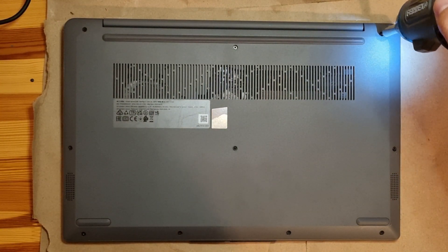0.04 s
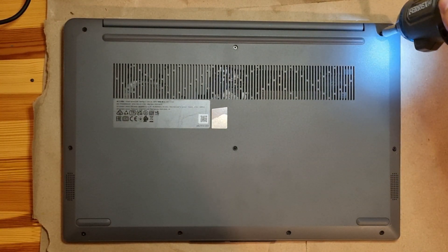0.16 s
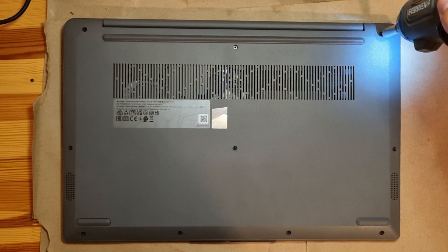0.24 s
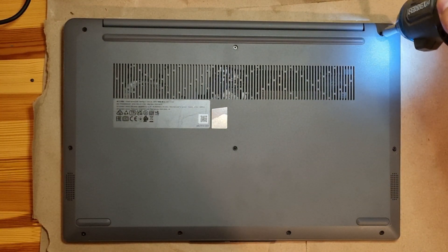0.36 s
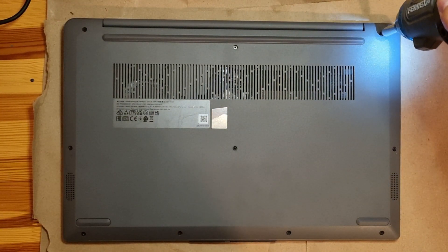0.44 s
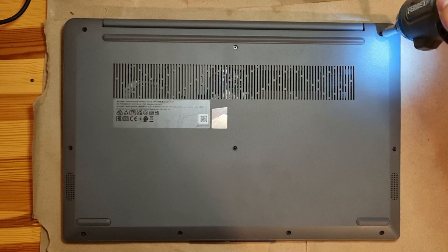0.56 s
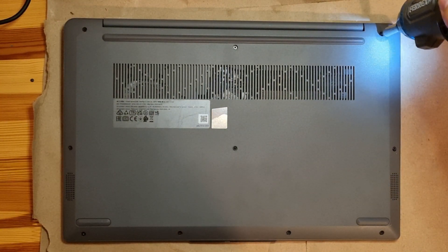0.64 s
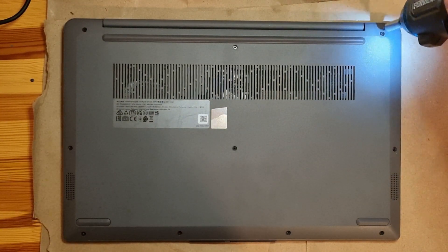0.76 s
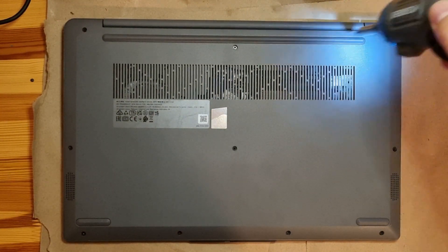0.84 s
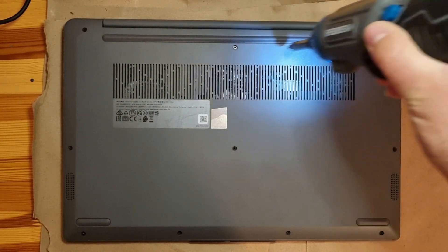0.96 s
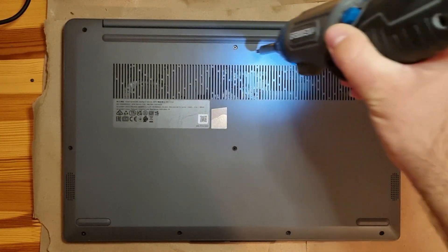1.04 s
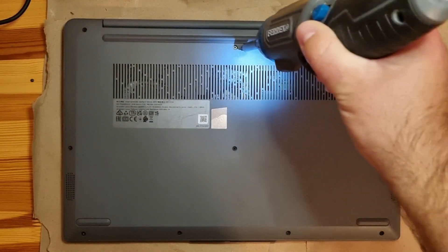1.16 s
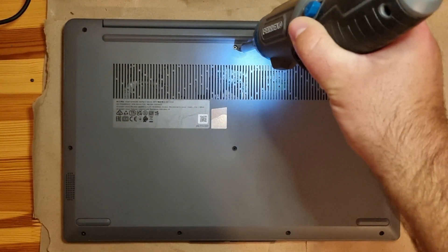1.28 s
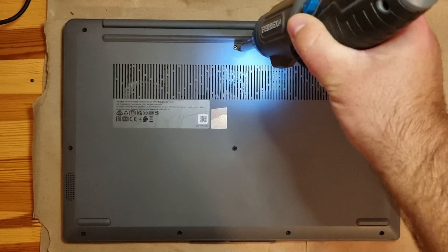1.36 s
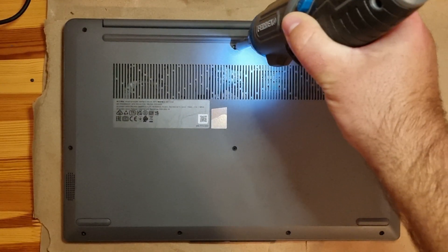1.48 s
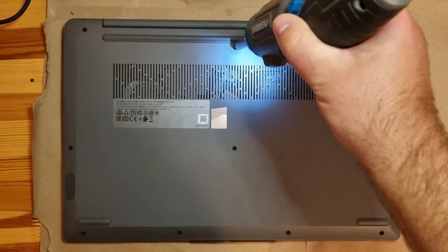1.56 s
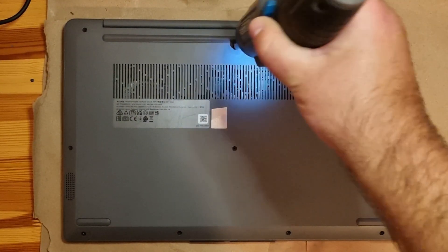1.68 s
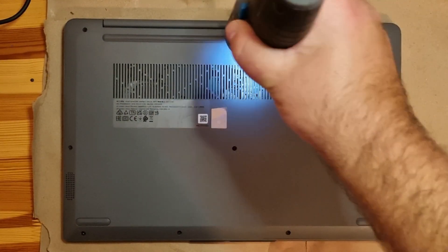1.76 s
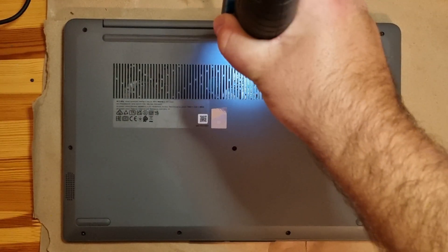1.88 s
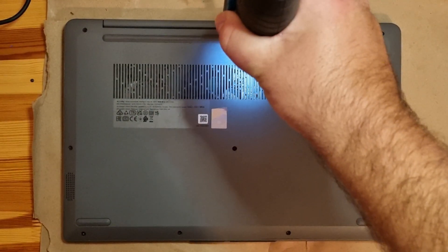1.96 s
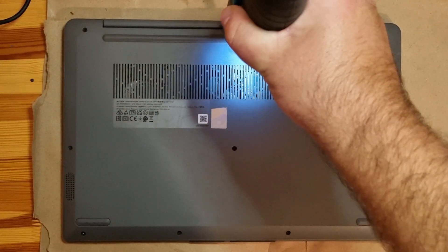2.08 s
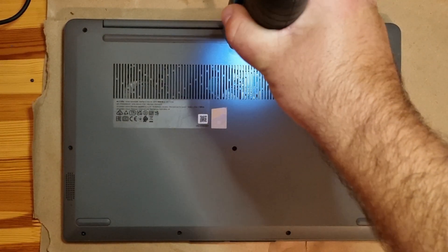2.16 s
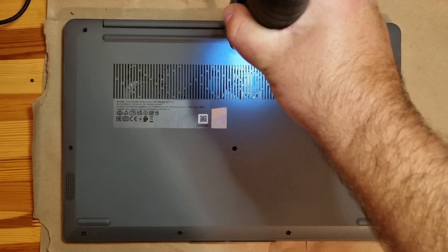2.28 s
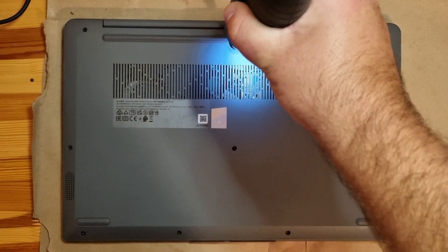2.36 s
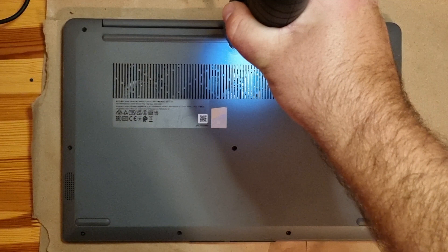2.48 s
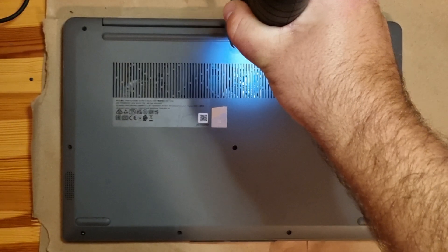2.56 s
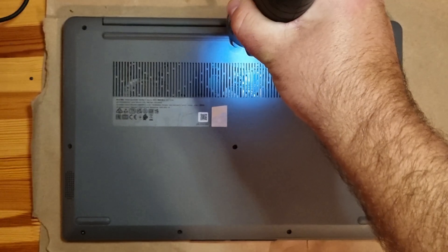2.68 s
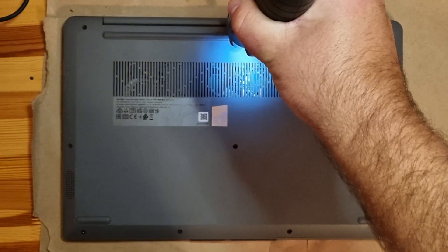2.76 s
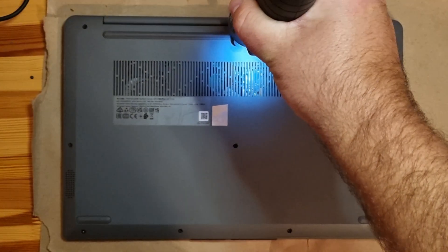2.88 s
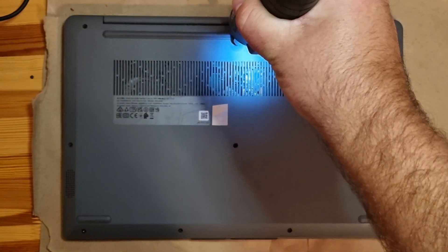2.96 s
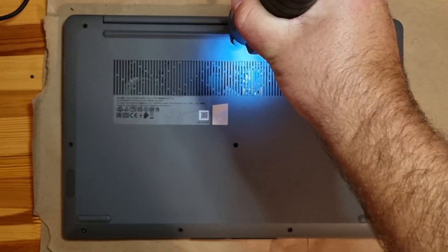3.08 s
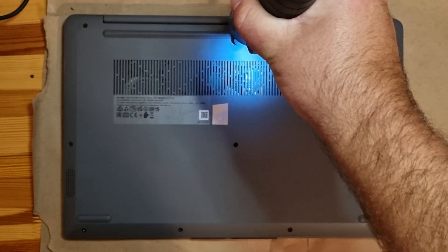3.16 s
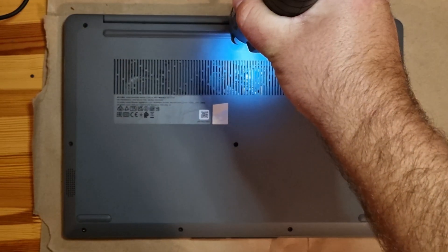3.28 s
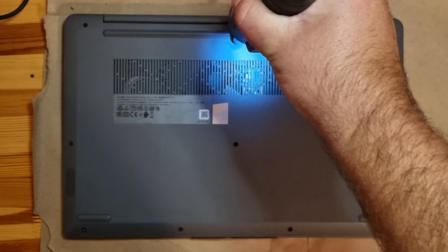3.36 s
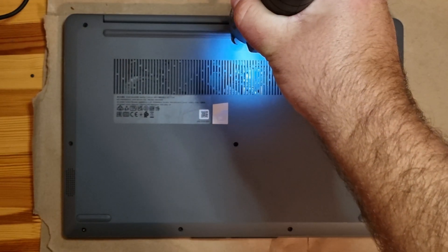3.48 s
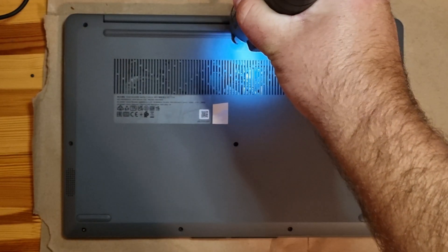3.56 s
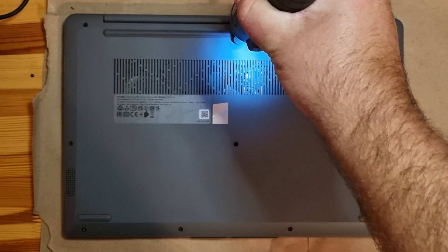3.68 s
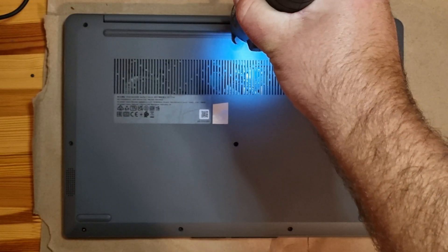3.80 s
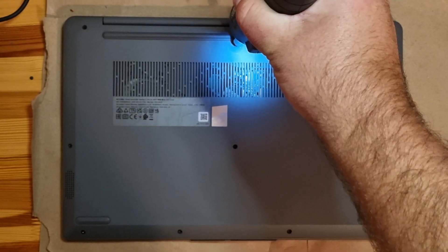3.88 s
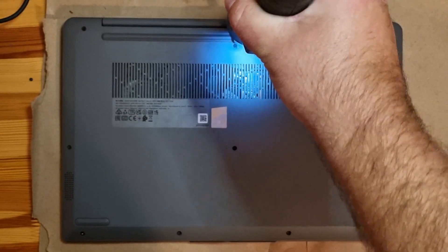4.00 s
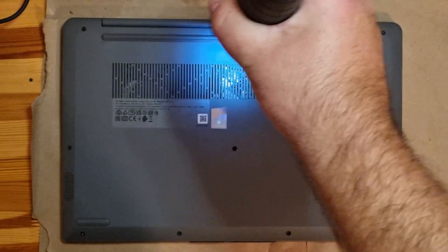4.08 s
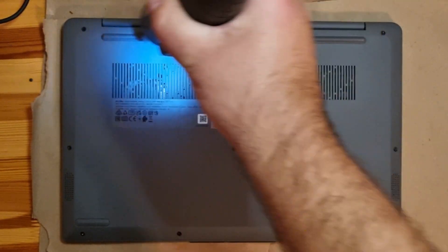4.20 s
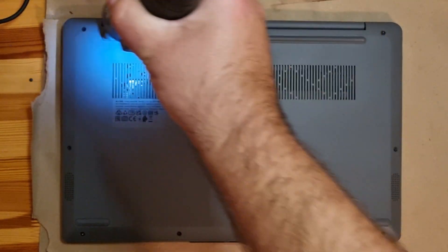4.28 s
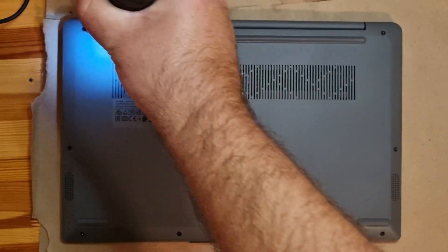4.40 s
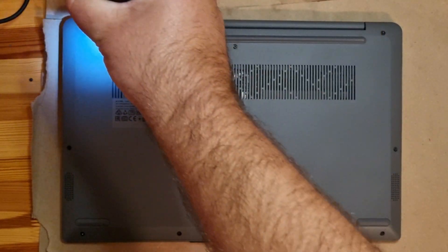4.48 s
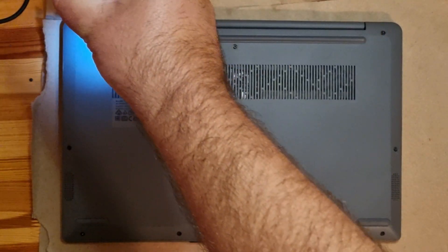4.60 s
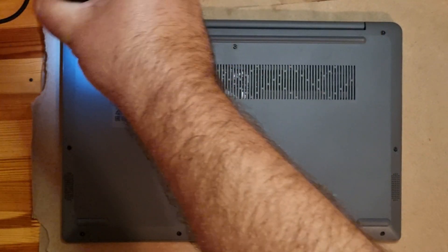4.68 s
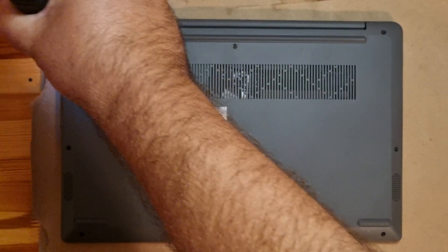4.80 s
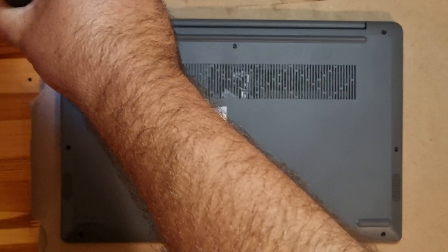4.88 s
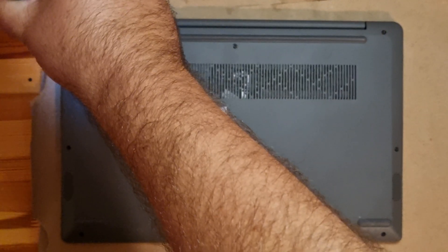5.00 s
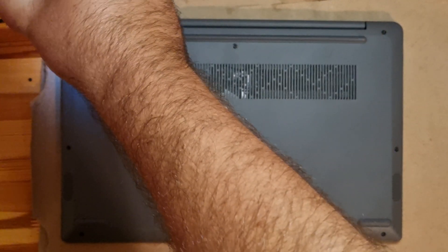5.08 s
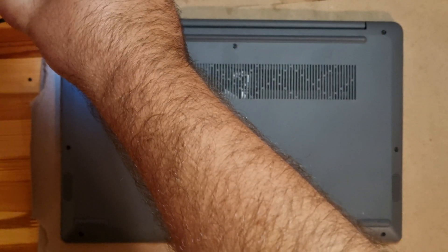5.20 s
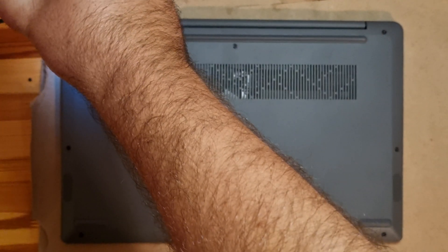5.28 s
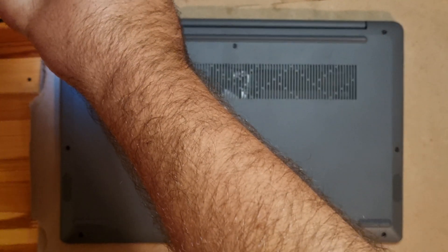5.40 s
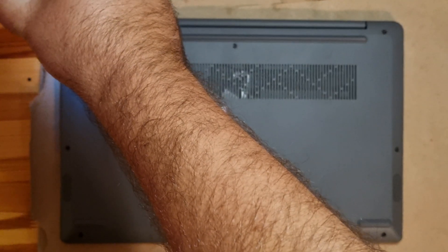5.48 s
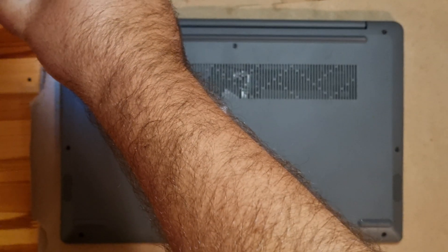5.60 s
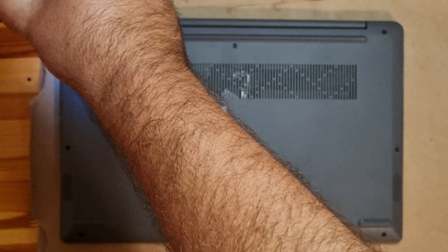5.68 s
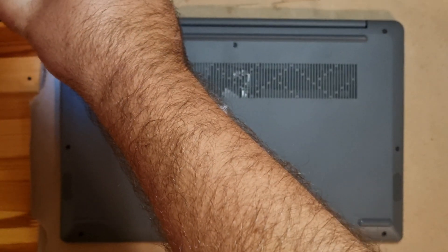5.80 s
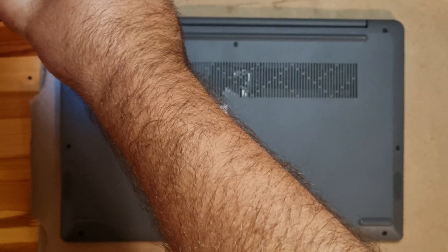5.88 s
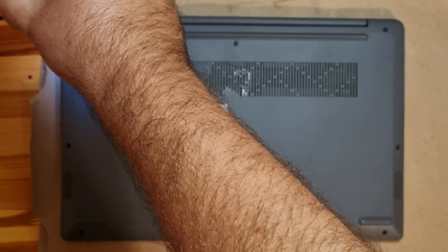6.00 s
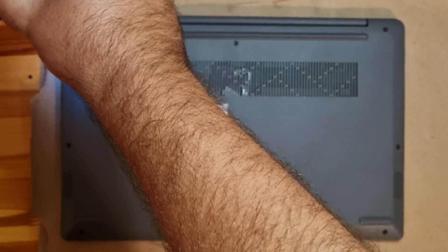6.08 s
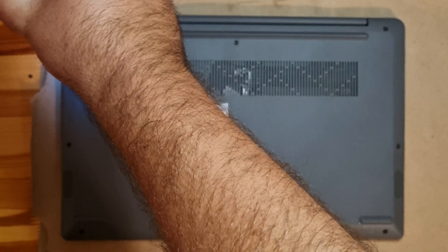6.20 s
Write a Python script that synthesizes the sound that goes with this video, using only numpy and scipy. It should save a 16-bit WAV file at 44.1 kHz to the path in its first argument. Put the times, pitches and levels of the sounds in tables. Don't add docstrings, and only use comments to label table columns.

```python
import sys
import numpy as np
from scipy import signal
from scipy.fft import rfft, irfft
from scipy.io import wavfile
from scipy.ndimage import uniform_filter1d, map_coordinates

SR = 44100
rng = np.random.default_rng(int(sys.argv[2]) if len(sys.argv) > 2 else 0)


def gain_from_db(level_db):
    decades = np.asarray(level_db, float) / 20
    return 10 ** decades


def master(y):
    cut = np.clip(np.atleast_2d(y).T, -1, 1)
    pcm = np.round(cut * 32767)
    wavfile.write(sys.argv[1], SR, pcm.astype(np.int16))


N = 275625
T = np.arange(N) / SR

# f/Hz, level/dB per Hz
AIR = [(15, -27), (25, -12), (108, -1), (317, -7), (463, 3.5), (1560, -10.5), (1890, -29), (2050, -7),
       (5730, -19.5), (14000, -50), (16000, -38)]
# f/Hz, side minus mid level/dB
SIDE_MINUS_MID = [(60, 4.5), (110, -15.5), (200, -3), (380, -9), (700, -2.5), (1290, 0), (2380, -4),
                  (4400, 1), (8120, -0.5), (15000, 0)]
# f/Hz, left minus right level/dB
LEFT_MINUS_RIGHT = [(60, -10), (110, 4.5), (200, 3), (380, 1.5), (700, 0.5), (1290, 0), (2380, 1.5),
                    (4400, -1), (8120, 2), (15000, -3.5)]

# t/s, then level/dB of each of the three desk modes
THUDS = [
    (0.449, -38, -44, -46.5),
    (3.668, -37.5, -57, -54),
    (3.84, -62, -70, -76),
    (4.768, -38.5, -67, -63),
    (4.818, -46, -78, -69),
    (4.94, -59, -86, -72),
]
# f/Hz, ring t/s
DESK_MODES = [(65, 0.25), (122, 1.18), (190, 0.61)]

# t/s, peak level/dB, centre f/Hz, length t/s
TICKS = [(0.446, -22, 2800, .002), (1.175, -36, 1700, 0.0051), (1.177, -46, 11500, 0.011),
         (1.197, -47.5, 11000, 0.015), (1.416, -50, 11000, 0.0087), (1.427, -52, 8000, 0.0045),
         (1.445, -43, 3300, 0.0049), (1.442, -40, 1500, 0.0044), (1.534, -69, 3800, .004),
         (1.54, -66, 3000, .004), (1.631, -53, 3500, 0.0065), (3.664, -27, 3300, .004),
         (4.432, -27.5, 2380, 0.003), (4.437, -37, 1500, 0.0048), (4.428, -39, 9000, 0.018),
         (4.548, -46, 1500, 0.005), (4.7078, -30, 3490, 0.0023)]
# t/s, peak level/dB, centre f/Hz, ring t/s, edge level/dB
TAPS = [(1.172, -30, 626, 0.054, -19), (1.194, -41, 632, 0.11, -12), (1.346, -48, 464, 0.07, -23),
        (1.3635, -42, 590, 0.076, -49), (1.389, -45, 579, 0.077, -38), (1.413, -36.5, 617, 0.13, -17),
        (1.429, -45, 640, 0.097, -24), (1.444, -38.5, 584, 0.047, -9), (1.469, -52, 650, 0.076, -23),
        (1.512, -49, 580, 0.056, -25), (4.345, -27.5, 920, 0.041, 3), (4.369, -30, 790, 0.052, -7),
        (4.376, -34.5, 766, 0.07, -13), (4.431, -30.5, 900, 0.03, -1), (4.547, -48, 756, 0.056, -9)]
# t/s, peak level/dB, centre f/Hz, ring t/s, edge level/dB
POPS = [
    (.4479, -10, 1440, 0.023, 8),
    (.449, -32, 490, 0.054, -16),
    (3.6628, -12, 756, 0.034, 0.5),
    (3.6643, -14.5, 1930, 0.019, -6),
    (3.6655, -31, 1090, 0.046, -6),
    (3.666, -39, 586, 0.09, 1),
    (4.347, -44, 366, 0.19, -30),
    (4.433, -45, 395, 0.19, -30),
]
COVER_HZ = np.geomspace(280, 4500, 30)

# start t/s, end t/s
RUNS = [
    (0, 1.63),
    (1.635, 4.7),
    (4.709, 6.25),
]
# release t/s, full shaft f/Hz, creep t/s, then middle, treble and cover buzz level/dB
TRIGGER = [
    (.635, 267.3, 0.23, -35, -36, -53),
    (3.915, 264.9, .12, -37, -36, -54),
    (6.5, 266.8, .4, -40, -37, -56.5),
]
FREED_S = [.448, 3.663, 7]
FULL_HZ = 266

ORDERS = [1, 2, 3, 4, 5, 6, 7.71, 9, 9.49, 10.09, 11.29, 12, 14, 15, 18, 21, 22, 23, 24, 27, 30, 33, 36, 48,
          58]
# level/dB in run 1, run 2 and run 3
WHINE = [(-56.5, -54.5, -54.5), (-95, -62.5, -66.5), (-56, -62, -67.5), (-54, -94, -84), (-79, -59.5, -67),
         (-59.5, -62.5, -63.5), (-71, -53, -60), (-54, -60, -54.5), (-72, -53.5, -71), (-74, -59, -63),
         (-72, -54, -57), (-60, -48.5, -51.5), (-70, -55.5, -60), (-62, -55, -58), (-67, -52, -56),
         (-68, -47.5, -56), (-71, -56, -56), (-55, -50.5, -53), (-58, -46.5, -57), (-53, -58, -50.5),
         (-68, -49, -54), (-56, -69, -66), (-69, -53, -57), (-60, -45, -63), (-63.5, -51, -59)]

# f/Hz, level/dB per Hz
FACING = [
    [(1000, -58), (1700, -11), (2340, -3), (2870, -5), (3130, -2.5), (4340, -6.5), (4510, -3.5), (6880, -3),
     (7770, -1), (8450, -4), (11000, -6), (12400, -2.5), (16000, -4)],
    [(1000, -38), (1700, -6.5), (1990, -5), (2590, -1), (3500, -2.5), (3810, -2), (4180, -4.5), (6150, -4),
     (7840, -9), (10200, -15), (12500, -12), (15100, -11), (16000, -11.5)],
    [(1000, -43), (1700, -10), (2010, -12), (2230, -10), (2450, -6), (2960, -7), (3500, -4.5), (4340, -7),
     (4910, -4.5), (7840, -8), (8860, -14.5), (15000, -10.5), (16000, -10.5)],
]
# f/Hz, width f/Hz, level/dB
HOUSING = [(420, 350, 7), (2100, 250, 7), (3600, 280, 6), (6210, 170, 9), (7750, 300, 3), (12500, 700, 0)]
# f/Hz, level/dB per Hz
BUZZ = [(100, -36), (200, -13.5), (330, -5.5), (420, -13.5), (560, -4.5), (800, -4), (1100, -2), (1400, 2),
        (1900, -7.5)]

# level/dB, rise t/s
START_DB = [-8, -16, -1]
RISE_S = [0.022, 0.023, .02]
SURGE_DB = [2.5, -1.5, 4.5]
FREED_DB = [0.6, 1, 4]
BRAKE_DB = [-2, 1, -2]
COAST_DB_PER_S = [-20.5, -37.5, -20.5]
STALL_DB_PER_S = [-63, -92, -12]
BRAKE_S = 0.04
TOP_HZ = 15750


def shape(x, points):
    hz, db = np.transpose(points)
    f = np.fft.rfftfreq(x.shape[-1], 1 / SR) + 1
    gain = gain_from_db(np.interp(np.log(f), np.log(hz), db))
    return irfft(rfft(x) * gain, x.shape[-1])


def unit(x):
    return x / np.sqrt(np.mean(x ** 2))


def walk(rate_hz):
    k = int(SR / rate_hz)
    held = np.repeat(rng.standard_normal(N // k + 1), k)
    return 1.22 * uniform_filter1d(uniform_filter1d(held, k), k)[:N]


def band(x, lo_hz, hi_hz):
    sos = signal.butter(3, [lo_hz, hi_hz], "bandpass", fs=SR, output="sos")
    return signal.sosfilt(sos, x, axis=-1)


def add(out, s, sound):
    i = int(s * SR)
    out[..., i:i + sound.shape[-1]] += sound[..., :N - i]


def microphones(mid, side, lead=0.38):
    quarter_turn = np.imag(signal.hilbert(mid))
    side = shape(np.sqrt(1 - lead ** 2) * side - lead * quarter_turn, SIDE_MINUS_MID)
    left_tilt = [(hz, db / 2) for hz, db in LEFT_MINUS_RIGHT]
    right_tilt = [(hz, -db) for hz, db in left_tilt]
    return np.array([shape(mid + side, left_tilt), shape(mid - side, right_tilt)])


def still_air():
    return gain_from_db(-63.5) * unit(microphones(*shape(rng.standard_normal((2, N)), AIR)))


def room(x, t60_s=0.5, level_db=-4):
    t = T[:SR // 2]
    colour = [(150, 16), (600, 1.5), (3000, 3), (12000, -10.0)]
    tail = shape(rng.standard_normal((2, len(t))), colour)
    tail = microphones(*(tail * 1000 ** (-t / t60_s) * np.clip(t / 0.0031, 0, 1)))
    tail /= np.sqrt(np.sum(tail ** 2) / 2)
    return gain_from_db(level_db) * signal.fftconvolve(x[None], tail, axes=1)[:, :N]


def desk_shake(shaft_hz):
    rumble = unit(band(rng.standard_normal((2, N)), 22, 120))
    return gain_from_db(-84.5 + 5.5 * walk(4.3)) * (shaft_hz / FULL_HZ) ** 2 * rumble


def desk_thuds():
    out, t = np.zeros(N), T[:SR]
    onset = 1 - np.exp(-t / 0.0015)
    for s, *levels_db in THUDS:
        for (hz, ring_s), db in zip(DESK_MODES, levels_db):
            tone = np.sin(2 * np.pi * hz * t) - 0.18 * np.sin(2.08 * np.pi * hz * t)
            add(out, s, gain_from_db(db) * tone * 1000 ** (-t / ring_s) * onset)
    return out


def bit_ticks(width=1.73):
    out, t = np.zeros((2, N)), T[:SR // 8]
    for s, peak_db, hz, length_s in TICKS:
        burst = band(rng.standard_normal((2, len(t))), hz / width, min(hz * width, TOP_HZ))
        envelope = np.exp(-t / length_s) * (1 - np.exp(-t / 0.00015))
        add(out, s, gain_from_db(peak_db) * unit(burst) / 2 * envelope)
    return microphones(*out)


def cover_blows(rows, focus, edge_hz, edge_focus, rise_s, scatter):
    out, t = np.zeros(N), T[:SR // 4]
    draws = rng.random((len(rows), 3, len(COVER_HZ), 1))
    for (s, peak_db, centre_hz, ring_s, edge_db), (size, detune, start) in zip(rows, draws):
        hz = COVER_HZ[:, None] * (1 + 0.082 * detune)
        near = np.exp(-(np.log(hz / centre_hz) / focus) ** 2)
        near += gain_from_db(edge_db) * np.exp(-(np.log(hz / edge_hz) / edge_focus) ** 2)
        fade = 1000 ** (-t / (ring_s * (700 / hz) ** 0.54))
        modes = (0.17 + size) * near * np.sin(2 * np.pi * (hz * t + scatter * start)) * fade
        ring = modes.sum(axis=0) * (1 - np.exp(-t / rise_s)) ** 2
        add(out, s, gain_from_db(peak_db) * ring / np.abs(ring).max())
    return band(out, 183, 9000)


def since(k):
    start_s = RUNS[k][0] or -3
    return np.maximum(T - np.array([[start_s], [FREED_S[k]], [TRIGGER[k][0]]]), 0)


def motor_speed():
    spin_up_s, creep_hz, freed_hz = 0.036, 7, 2
    brake_hz, coast_hz_per_s, crawl_hz = 20, 230, 59.88
    shaft_hz = np.zeros(N)
    for k, (_, full_hz, creep_s, *_) in enumerate(TRIGGER):
        on, free, off = since(k)
        speed = full_hz * (1 - 0.6 * np.exp(-on / spin_up_s))
        speed -= creep_hz * np.exp(-on / creep_s)
        speed += freed_hz * (free > 0)
        speed -= brake_hz * (1 - np.exp(-off / BRAKE_S)) + coast_hz_per_s * off
        shaft_hz = np.where(T >= RUNS[k][0], np.maximum(speed, crawl_hz), shaft_hz)
    return shaft_hz


def whine(shaft_hz, drive_db=3.5, waver=0.001225):
    turn = 2 * np.pi * np.cumsum(shaft_hz * (1 + waver * walk(25))) / SR
    run = np.searchsorted([t0 for t0, _ in RUNS], T, "right") - 1
    slow = np.clip(1 - shaft_hz / FULL_HZ, 0, 1)
    out = 0
    for k, db in zip(ORDERS, WHINE):
        loose = min((k / 9) ** 2, 1)
        fade_db = -(55 if k == 3 else 200 + 60 * loose) * slow
        rough = 1 - 0.2 * loose + loose * (walk(60 + 2 * k) + 1j * walk(60 + 2 * k))
        level = gain_from_db(np.array(db)[run] + drive_db + fade_db + 1.2 * walk(4))
        skew = loose * (rng.uniform(-1.53, 1.93) + 0.37 * walk(5))
        phase = k * turn + np.outer([1, -1], skew)
        out = out + level * np.imag(rough * np.exp(1j * phase))
    return out


def rattle_db(k, j):
    surge_s, stall_s = 0.057, 0.4
    on, free, off = since(k)
    db = TRIGGER[k][3 + j] + START_DB[j] * np.exp(-on / RISE_S[j])
    db += SURGE_DB[j] * on / surge_s * np.exp(1 - on / surge_s)
    db += FREED_DB[j] * (free > 0)
    db += BRAKE_DB[j] * (1 - np.exp(-off / BRAKE_S)) + COAST_DB_PER_S[j] * off
    return db + STALL_DB_PER_S[j] * np.maximum(off - stall_s, 0)


def recurring_clatter(turn, slots=210, memory=0.72):
    fresh = rng.standard_normal((2, int(turn[-1]) + 2, slots))
    kept = signal.lfilter([np.sqrt(1 - memory ** 2)], [1, -memory], fresh, axis=1).reshape(2, -1)
    return np.array([unit(map_coordinates(v, [turn * slots], order=3)) for v in kept])


def tooth_ticks(shaft_hz, scatter_db=1.0, mesh=0.26, wobble=0.092, repeat=0.24):
    turn = np.cumsum(shaft_hz) / SR
    size = gain_from_db(scatter_db * uniform_filter1d(rng.exponential(1, N), size=6))
    size *= 1 + mesh * np.cos(12 * np.pi * turn)
    size *= 1 + wobble * (np.cos(2 * np.pi * turn) + np.sin(4 * np.pi * turn))
    share = repeat * np.clip(shaft_hz / FULL_HZ, 0, 1) ** 2
    fresh = unit(size) * rng.standard_normal((2, N))
    return microphones(*(np.sqrt(1 - share) * fresh + np.sqrt(share) * recurring_clatter(turn)))


def gears(shaft_hz, flicker_db=1.05):
    teeth = tooth_ticks(shaft_hz)
    f = np.fft.rfftfreq(N, 1 / SR)
    resonance = sum(gain_from_db(db) / (1 + 2j * (f - c) / w) for c, w, db in HOUSING)
    rings = irfft(rfft(teeth) * resonance, N)
    slack = np.clip(1.6 * (1 - shaft_hz / FULL_HZ), 0, 1) * np.clip(shaft_hz / 165, 0, 1) ** 3
    knock = (1 - 0.55 * slack) * teeth + slack * rings
    flicker = flicker_db * walk(13)
    out = np.zeros((2, N))
    for k, ((t0, t1), colour) in enumerate(zip(RUNS, FACING)):
        faced = shape(knock, colour)
        middle, treble = band(faced, 1900, 8000), band(faced, 8000, 17000)
        buzz = band(shape(knock, BUZZ), 90, 1900)
        running = (T >= t0) * (T < t1 + 0.005)
        for j, part in enumerate([middle, treble, buzz]):
            level = gain_from_db(rattle_db(k, j) + flicker)
            out += part / part.mean(axis=0).std() * level * running
    return out


def scene():
    shaft_hz = motor_speed()
    pops = cover_blows(POPS, focus=0.25, edge_hz=1810, edge_focus=0.31, rise_s=0.00036, scatter=0.037)
    taps = cover_blows(TAPS, focus=0.17, edge_hz=2100, edge_focus=0.18, rise_s=0.00069, scatter=0.44)
    ticks = bit_ticks()
    echoes = room(gain_from_db(-1.5) * pops + taps + gain_from_db(2.5) * ticks[0])
    background = still_air() + echoes + desk_shake(shaft_hz) + desk_thuds()
    return background + ticks + pops + taps + whine(shaft_hz) + gears(shaft_hz)


def top_cut(x):
    return signal.sosfilt(signal.butter(12, 16870, fs=SR, output="sos"), x)


def record(dry):
    steep = signal.ellip(14, 0.2, 70, TOP_HZ, fs=SR, output="sos")
    mix = signal.sosfilt(steep, dry)
    return top_cut(mix)


dry = scene()
out = record(dry)
master(out)
```